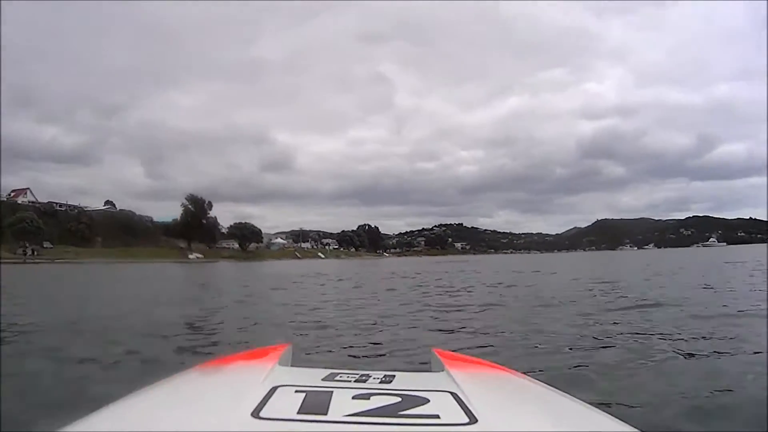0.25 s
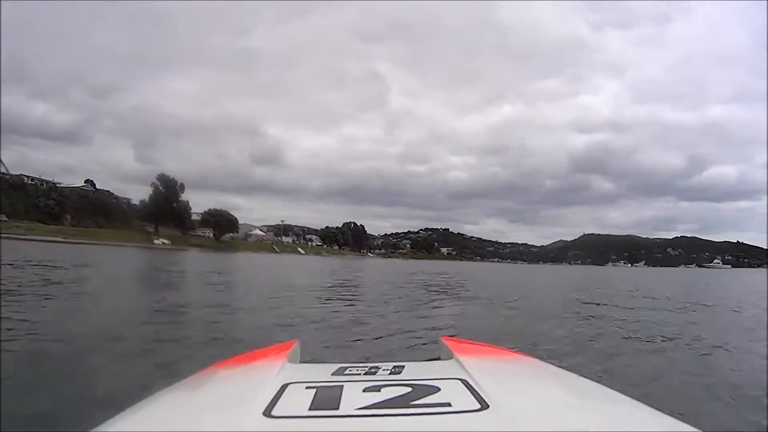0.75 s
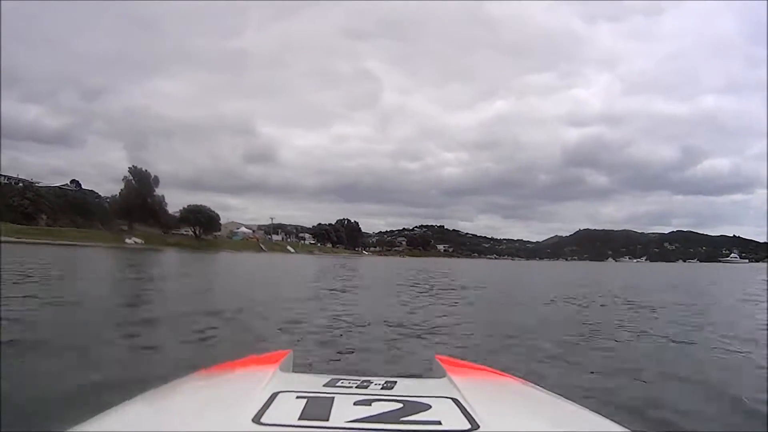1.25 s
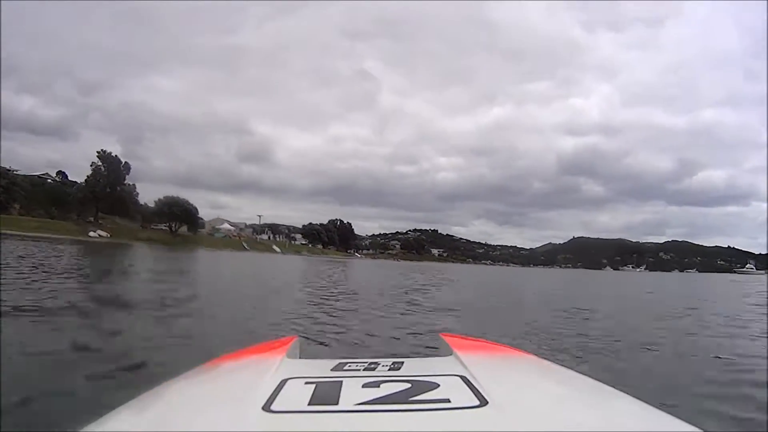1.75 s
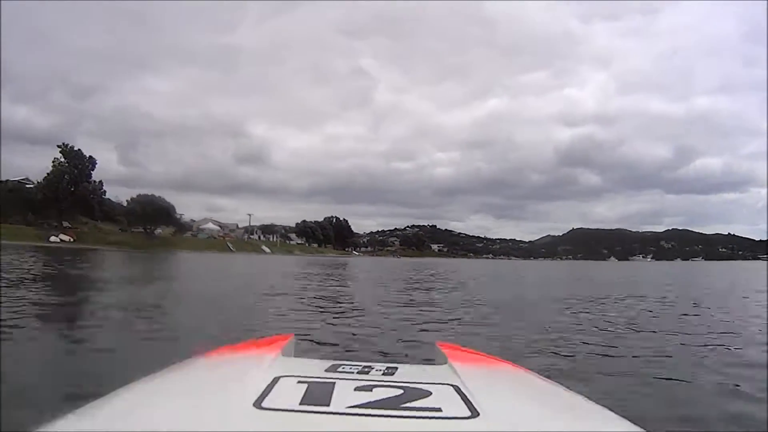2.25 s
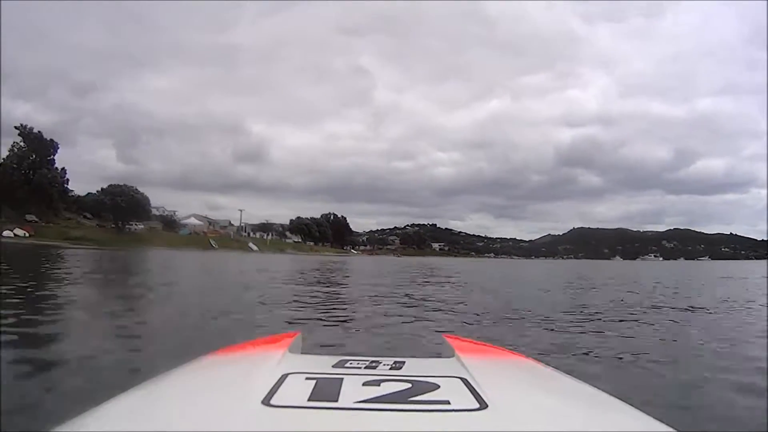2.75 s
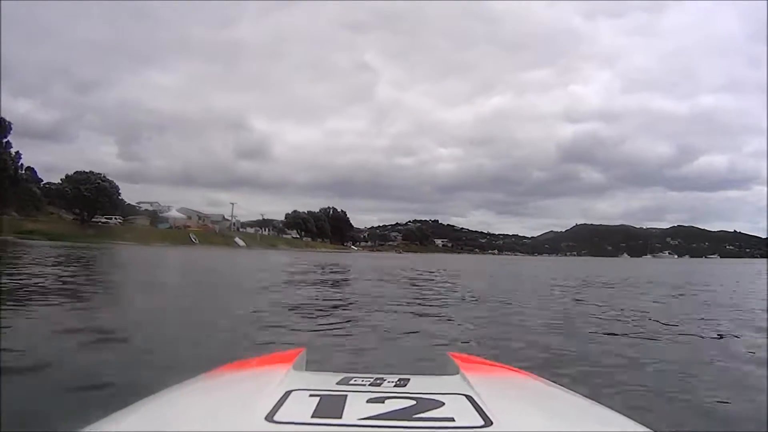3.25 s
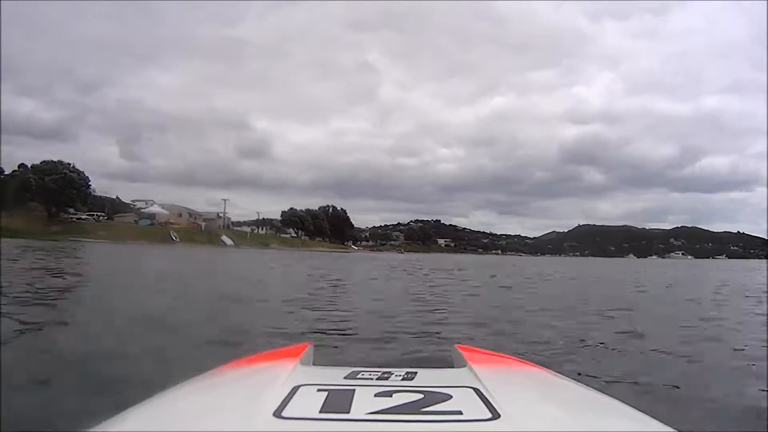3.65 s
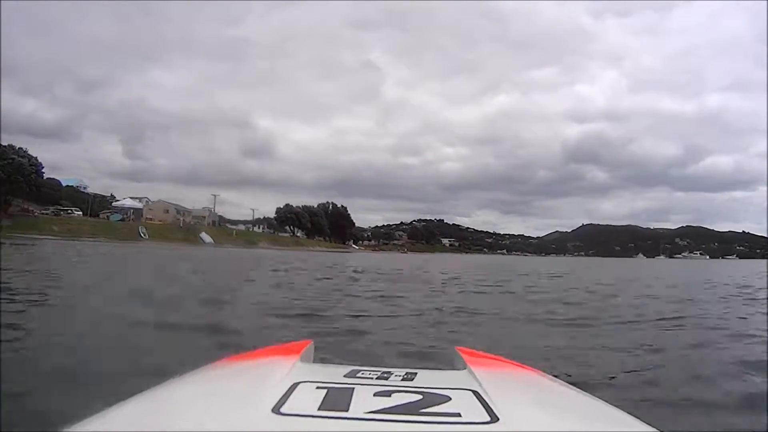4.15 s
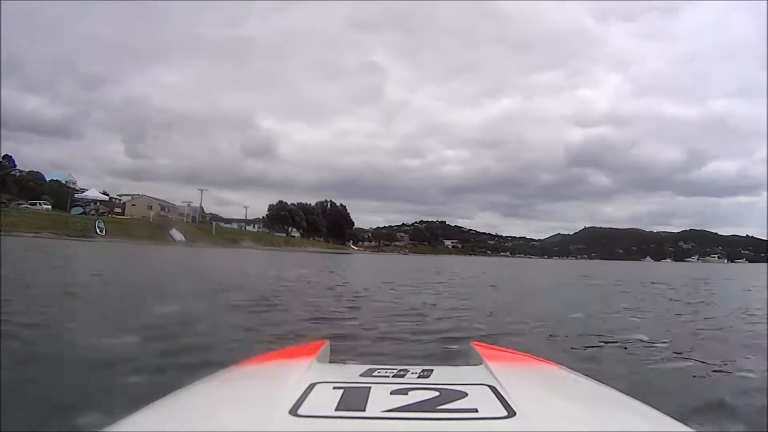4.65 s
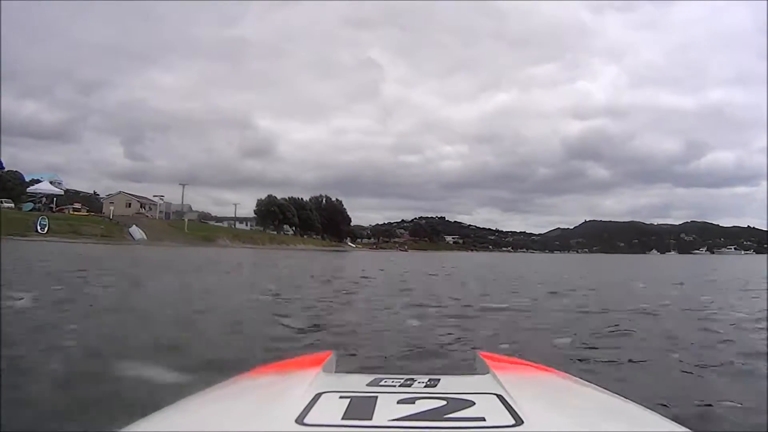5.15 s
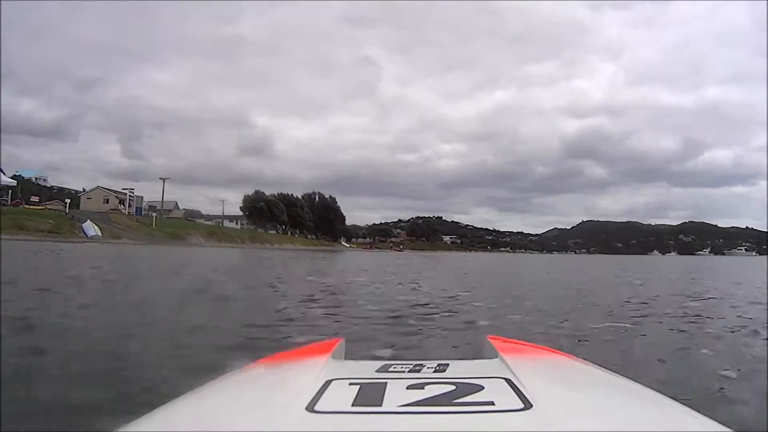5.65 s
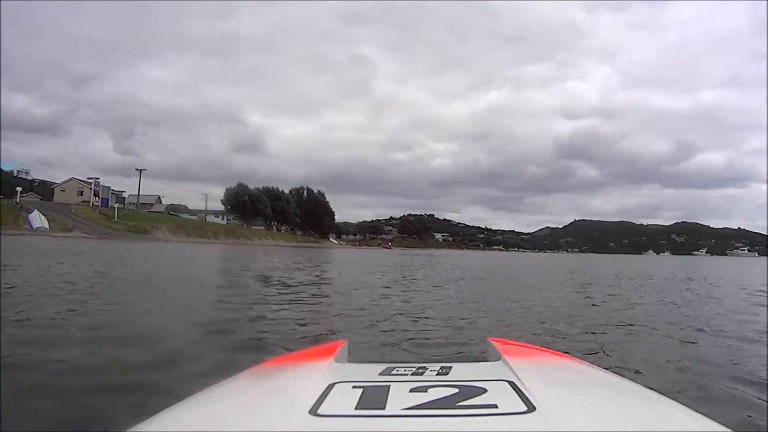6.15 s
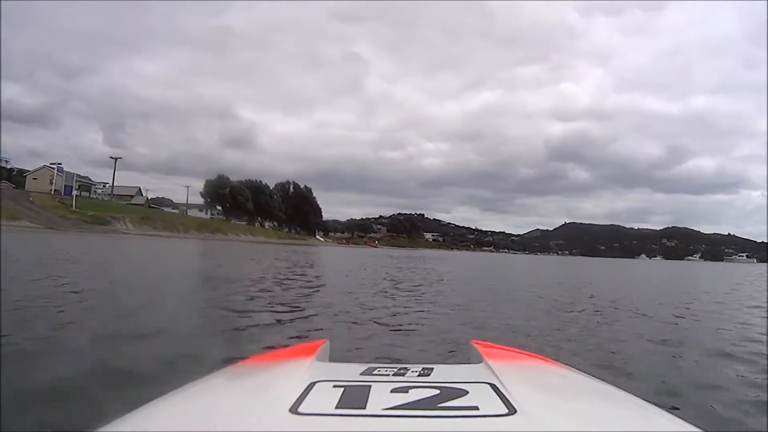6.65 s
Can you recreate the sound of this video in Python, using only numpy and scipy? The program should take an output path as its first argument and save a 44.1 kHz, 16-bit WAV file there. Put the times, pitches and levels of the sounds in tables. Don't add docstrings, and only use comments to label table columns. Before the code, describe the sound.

Close on deck, a steady buzzing high motor whine wavers over rushing spray, then drops abruptly at about five seconds and sinks as the boat settles.

```python
import sys
import numpy as np
from scipy import signal
from scipy.fft import rfft, irfft, next_fast_len
from scipy.io import wavfile
from scipy.ndimage import uniform_filter1d, map_coordinates

SR = 44100
rng = np.random.default_rng(int(sys.argv[2]) if len(sys.argv) > 2 else 0)


def transcribe(u):
    v = np.clip(np.atleast_2d(u).T, -1, 1)
    q = np.round(v * 32767).astype(np.int16)
    wavfile.write(sys.argv[1], SR, q)


def invert_db(x):
    u = np.asarray(x, float) / 20
    return 10 ** u


N = 305172

# time_s, shaft_hz, blade_bite_db
SHAFT = [(0, 498, -21), (.15, 498, -17), (4.7, 498, -17), (4.75, 425, -25), (4.79, 408, -25),
         (4.83, 421, -23), (4.91, 421, -24), (4.95, 413, -17.5), (5.03, 370, -30), (5.08, 325, -35),
         (5.2, 312.3, -48), (5.36, 292.8, -48), (5.6, 282.8, -39), (5.8, 279.7, -37), (5.87, 269.8, -37),
         (6.2, 250, -32), (6.5, 241, -32), (6.92, 230.3, -33)]
# top_s, rise_percent, sag_percent
RACES = [(0.069, 1.4, 2), (.2, 1.62, 0), (.29, 1.87, 1), (.495, 4.5, 0), (.62, 3.2, 1), (0.751, 2.65, 3),
         (0.901, 3.3, 1), (1.075, 2.9, 1), (1.225, 2.6, 0), (1.29, 1.2, 2.5), (1.45, 2.2, 0),
         (1.555, 2.7, 1.5), (1.76, 5.7, 3), (1.861, 4.8, 1), (2, 2.2, 1.5), (2.1, 3.428, 1),
         (2.22, 3.07, 0), (2.35, 1.92, 2.5), (2.61, 2.467, 3), (2.745, 4.47, 3.5), (3.01, 3.2, 1),
         (3.23, 2.52, 1.5), (3.469, 2.56, .5), (3.67, 3, 0), (3.915, 2.6, 0.98), (4.19, 2.38, 0.45),
         (4.391, 2, 1), (4.55, 1.78, 1.5), (4.65, 1.4, 0.9)]
# centre_s, length_s
GULPS = [(2.838, 0.015), (2.978, 0.021), (3.56, 0.014), (3.929, .01), (4.114, 0.0089), (4.605, 0.0046)]
# order, full_speed_db, slowed_db, left_lead_rad
SIDE_ORDERS = [(2, -38, -40, 1.8), (4, -46, -36, -1.5), (15, -60, -75, 0), (21, -72, -85, 0),
               (5, -46, -33, .6), (6, -42, -30, .6), (9, -50, -39, 1), (17, -75, -50, 2)]
# time_s, settled_0_to_1, spray_thrown_db
HULL = [(0, 0.2, -4), (.12, 0, 1), (1.5, 0, 0), (3.1, 0, .5), (4.62, 0, -.5), (4.8, 0, -4),
        (4.95, 0.1, -1.5), (5.05, 0, -4), (5.11, 0, 2.5), (5.36, .3, 4), (5.45, .45, 2.5), (5.52, .55, -2),
        (5.78, .75, -1.5), (5.86, .85, 1), (6.2, 1, 0), (6.44, 1.05, 1.5), (6.6, .95, 0), (6.92, 1.1, 1)]
# drum_db, roar_db, spray_db, mist_db, wash_db
PLANING_DB = [-49, -19.5, -31, -45, -50]
SETTLED_DB = [8.7, 4.84, 3.44, 0.91, 17.7]
THROWN_SHARE = [.3, 0, .65, 1.1, .3]
HEAVE_SHARE = [1, 0.16, 0.075, 0.076, .2]
# pitch_hz, density_db_per_hz
DRUM = [(15, -47), (25, -17.5), (55, -15), (70, -6.5), (84, 1), (100, -9.5), (125, -7.5), (220, -18.5),
        (350, -50.5)]
# pitch_hz, density_db_per_hz
ROAR = [(120, -31.5), (200, -22.5), (350, -13.5), (600, -12.5), (850, -15.5), (1100, -9.5), (1250, -5),
        (1480, 3.5), (1800, -5.5), (2100, -15), (2400, -33), (3000, -66.5)]
# pitch_hz, density_db_per_hz
SPRAY = [(1500, -41), (2100, -4.5), (2700, -1.5), (3250, -3), (3700, -14), (5600, -16), (6500, -19),
         (7500, -47), (9000, -96.5)]
# pitch_hz, density_db_per_hz
MIST = [(5000, -60), (6200, -9), (7000, -2), (8100, -7.5), (8400, -12), (9500, -11.5), (10200, -19.5),
        (11000, -15.5)]
# pitch_hz, density_db_per_hz
WASH = [(450, -40), (620, -10), (720, 1), (820, -7), (1000, -41)]
# pitch_hz, width_hz, lift_db
HOUSING = [(2743, 77, 3.5), (4515, 570, 5), (5010, 140, 9.5), (5330, 81, 6.5), (6050, 200, 2.5),
           (7670, 300, 9.5), (8760, 240, 8), (10700, 200, 4.5)]
# pitch_hz, left_minus_right_db, likeness_0_to_1, left_lead_rad
PORTS = [(60, 1, .8, .5), (180, 4.5, 1, 1.42), (350, 0.5, 0.1, 2), (590, -3, 0, 2.5), (870, 7.5, 0.7, 1.13),
         (1020, -3, 0.8, 2), (1540, 6, 0.85, 0.53), (1930, 4, 1, 1.21), (2300, 2.5, 0.8, 1.5),
         (3350, 3, 0.6, 1.5), (4100, -6, 0, 3), (4870, 2, 0.9, -0.77), (5860, 1, 0.2, 1.5),
         (10000, 1, 0.5, 2)]
# start_s, slap_peak_db, left_minus_right_db, heave_db
WAVES = [(.019, -17.5, 0, 6), (0.06, -17.5, 0, 2), (.288, -23, 1, 5), (.462, -27.5, 6, 4.5),
         (.547, -24, -0.5, 6), (.879, -25, 2.5, -2), (1.071, -33, -3, 11.5), (1.247, -27, 7, 6.5),
         (1.506, -29, 12, 7), (1.791, -29, 4, 6.5), (1.869, -27.5, -5, 16.5), (2.043, -30, 5, 5),
         (2.24, -25.5, 12.5, 8.5), (2.33, -25, -14, 4), (2.667, -24, -2.5, 0.5), (2.794, -34.5, -5, 1.5),
         (3.2, -33, 10, 8), (3.534, -18, 4.5, 12), (4.349, -33, 1.5, 7.5), (4.458, -34, 5, 5),
         (4.671, -24.5, 11, 6), (4.729, -24.5, 1.5, 9.5), (4.823, -28.5, -5.5, 1), (5.005, -29, -6.5, -2),
         (5.36, -32, 9.5, 8.5), (5.826, -24.5, -7.5, 7.5), (6.12, -33.5, 0, 10), (6.3, -30, -1, 7),
         (6.42, -34.5, -2.5, 10), (6.573, -24.5, -10, 1.5)]
# pitch_hz, level_db
SLAP_COLOUR = [(40, -4.5), (150, 4.5), (500, 10), (1200, -1.5), (3000, -6.5), (7000, -33.5)]
# time_s, level_db
WHISTLE = [
    (0, -95),
    (5.04, -95),
    (5.08, -56),
    (6.92, -54),
]

FULL_SPEED_HZ = 498


def unit(x):
    return x / np.sqrt(np.mean(np.abs(x) ** 2) + 1e-20)


def along(points, hz, axis=1):
    table = np.transpose(points)
    return np.interp(np.log(hz + 1), np.log(table[0] + 1), table[axis])


def curves(rows):
    s, *cols = np.transpose(rows)
    return [np.interp(np.arange(N) / SR, s, c) for c in cols]


def wobble(rate):
    coarse = np.arange(0, N + 32, 32)
    knots = rng.standard_normal(N // 200)
    curve = map_coordinates(knots, [coarse * rate / SR])
    return unit(np.interp(np.arange(N), coarse, curve))


def filtered(x, response):
    m = next_fast_len(N + 8192)
    return irfft(rfft(x, m) * response(np.fft.rfftfreq(m, 1 / SR)), m)[..., :N]


def shaft():
    throttle_hz, bite_db = curves(SHAFT)
    t = np.arange(N) / SR
    climb_s, drop_s, recover_s = .06, .03, .09
    shape_s = [-climb_s, 0, drop_s, drop_s + recover_s]
    race = sum(np.interp(t - top, shape_s, [0, rise, -sag, 0]) for top, rise, sag in RACES)
    return throttle_hz * (1 + race / 100), bite_db


def order(turns, multiple, froth, froth_hz, apart, lead):
    def scatter():
        return (wobble(froth_hz) + 1j * wobble(froth_hz)) / np.sqrt(2)

    shared = np.sqrt(1 - froth) + np.sqrt(froth) * scatter()
    pair = np.array([np.sqrt(1 - apart) * shared + np.sqrt(apart) * scatter() for port in range(2)])
    pair = pair / (1 + (np.abs(pair) / 6.1) ** 4) ** 0.14
    phase = 2 * np.pi * multiple * turns + lead * np.array([[.5], [-.5]])
    return unit(np.real(pair * np.exp(1j * phase)))


def unbalance(speed_hz, slow, turns):
    mount_hz, mount_width_hz, mount_db = 338, 48.4, 13
    level_db = -32.5 + 14 * np.log2(speed_hz / FULL_SPEED_HZ)
    level_db += mount_db * np.exp(-((speed_hz - mount_hz) / mount_width_hz * 2) ** 2)
    level_db += 0.1566 * np.clip(speed_hz - FULL_SPEED_HZ, 0, 40)
    froth = .45 + 2 * slow - 3.2 * slow ** 2 + 1.1 * slow ** 4
    return invert_db(level_db + 2.5) * order(turns, multiple=1, froth=froth, froth_hz=55, apart=.4, lead=-1.2)


def blade_pass(speed_hz, bite_db, slow, turns):
    t = np.arange(N) / SR
    bite = np.prod([1 - 0.89 * np.exp(-((t - s) / length * 2.3) ** 4) for s, length in GULPS], axis=0)
    level_db = bite_db - .14 * np.clip(speed_hz - 497, 0, 40)
    side_db = np.array([[2.6], [-3.6]])
    tone = order(turns, multiple=3, froth=.2 + .4 * slow ** 2, froth_hz=110, apart=.03, lead=.6)
    return invert_db(level_db + 4.5 + side_db) * bite * tone


def side_orders(slow, turns):
    sound = np.zeros((2, N))
    side_db = np.array([[1.5], [-1.5]])
    for multiple, full_db, slowed_db, lead in SIDE_ORDERS:
        tone = order(turns, multiple, froth=.9 - .6 * slow, froth_hz=70, apart=.3, lead=lead)
        level_db = full_db + (slowed_db - full_db) * slow - 23 * slow * (1 - slow)
        sound += invert_db(level_db + side_db) * tone
    return sound


def propeller():
    speed_hz, bite_db = shaft()
    slow = np.clip((480 - speed_hz) / 190, 0, 1)
    unsteady = .008 * (1 - .75 * slow ** 2) * wobble(85)
    turns = np.cumsum(speed_hz * (1 + unsteady)) / SR
    sound = unbalance(speed_hz, slow, turns)
    sound += blade_pass(speed_hz, bite_db, slow, turns)
    return sound + side_orders(slow, turns)


def ports(hz):
    tilt = invert_db(along(PORTS, hz) / 2) * np.exp(.5j * along(PORTS, hz, axis=3))
    return np.array([tilt, 1 / tilt])


def rush(gain, patchy_db):
    z = signal.stft(rng.standard_normal((2, N)), nperseg=256)[2]
    field = uniform_filter1d(rng.standard_normal(z.shape[1:]), size=10, axis=0)
    field = uniform_filter1d(field, size=9, axis=1)
    pair = signal.istft(z * invert_db(patchy_db * unit(field)), nperseg=256)[1][:, :N]

    def split(hz):
        turn = np.arccos(np.clip(along(PORTS, hz, axis=2), 0, 1)) / 2
        return gain(hz) * np.array([np.cos(turn), np.sin(turn)])

    a, b = filtered(pair, split)
    return unit(filtered(np.array([a + b, a - b]), ports))


def housing(hz):
    return invert_db(sum(db / (1 + ((hz - c) / w * 2) ** 2) for c, w, db in HOUSING))


def water_levels():
    settled, thrown_db = curves(HULL)
    t = np.arange(N) / SR
    lag_s, heave_s = 0.023, 0.042
    heave_db = sum(db * np.exp(-((t - s - lag_s) / heave_s) ** 2) for s, slap, pan, db in WAVES)
    layers = zip(PLANING_DB, SETTLED_DB, THROWN_SHARE, HEAVE_SHARE)
    return [db + more * settled + a * thrown_db + b * heave_db for db, more, a, b in layers]


def water():
    drum_db, roar_db, spray_db, mist_db, wash_db = water_levels()
    chop = wobble(14)
    hiss_db = 0.51 * chop + 0.22 * wobble(30) + 0.23 * wobble(6)
    drum = rush(lambda hz: invert_db(along(DRUM, hz)), patchy_db=0.6)
    roar = rush(lambda hz: invert_db(along(ROAR, hz)), patchy_db=1.7)
    spray = rush(lambda hz: housing(hz) * invert_db(along(SPRAY, hz)), patchy_db=1.91)
    mist = rush(lambda hz: housing(hz) * invert_db(along(MIST, hz)), patchy_db=2.0)
    wash = rush(lambda hz: invert_db(along(WASH, hz)), patchy_db=1.0)
    sound = invert_db(drum_db + 1.4 * wobble(5.4)) * drum
    sound += invert_db(roar_db + 1.0 * chop) * roar
    sound += invert_db(spray_db + hiss_db) * spray
    sound += invert_db(mist_db + hiss_db) * mist
    return sound + invert_db(wash_db + 0.8 * chop) * wash


def slaps():
    blows = np.zeros((2, N + SR))
    t = np.arange(SR // 10) / SR
    blow, splash = invert_db(-60 * t / .02), .25 * invert_db(-60 * t / .12)
    burst = (1 - np.exp(-t / .002)) * (blow + splash)
    for s, db, pan_db, heave_db in WAVES:
        noise = rng.standard_normal(len(t)) + 0.53 * rng.standard_normal((2, len(t)))
        gain = invert_db(db + 12 + pan_db * np.array([[.5], [-.5]]))
        start = round(s * SR)
        blows[:, start:start + len(t)] += gain * burst * noise
    return filtered(blows[:, :N], lambda hz: invert_db(along(SLAP_COLOUR, hz)))


def controller():
    level_db, = curves(WHISTLE)
    whistle_hz = 8019
    drift_rad = 1.2 * np.array([wobble(14), wobble(14)])
    tone = np.sin(2 * np.pi * whistle_hz * np.arange(N) / SR + drift_rad)
    return invert_db(level_db + 1.2 * wobble(8.8)) * tone


def scene():
    return propeller() + water() + slaps() + controller()


def band_limit(x):
    return signal.sosfilt(signal.butter(12, 10950, fs=SR, output="sos"), x)


def record(dry):
    envelope = np.abs(signal.hilbert(dry[0], next_fast_len(N))[:N])
    swell = uniform_filter1d(envelope, size=60)
    limited = dry / (1 + (swell / .62) ** 4) ** .25
    return band_limit(limited)


dry = scene()
out = record(dry)
transcribe(out)
```